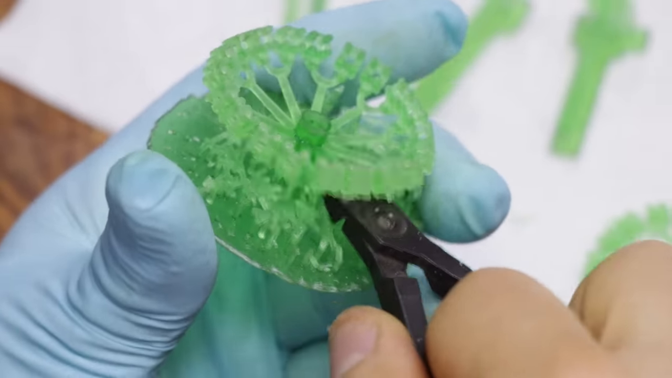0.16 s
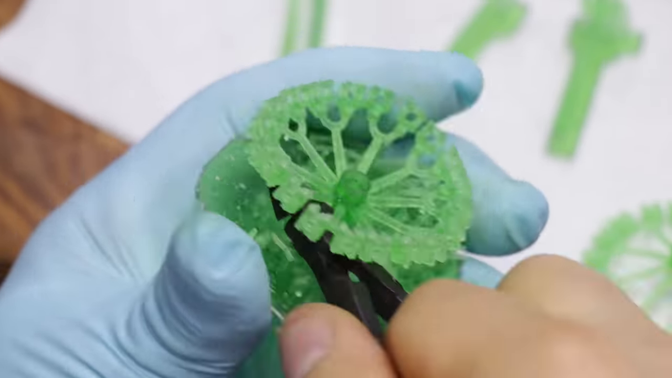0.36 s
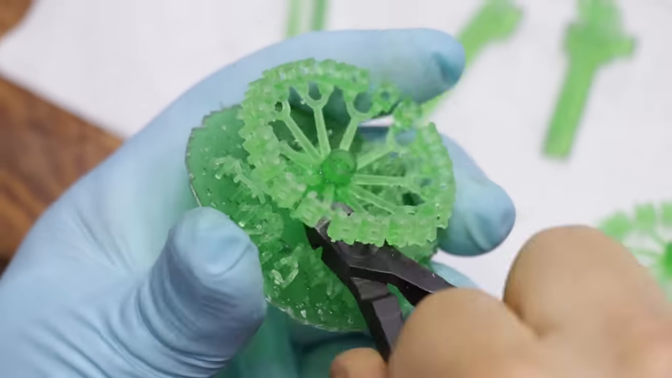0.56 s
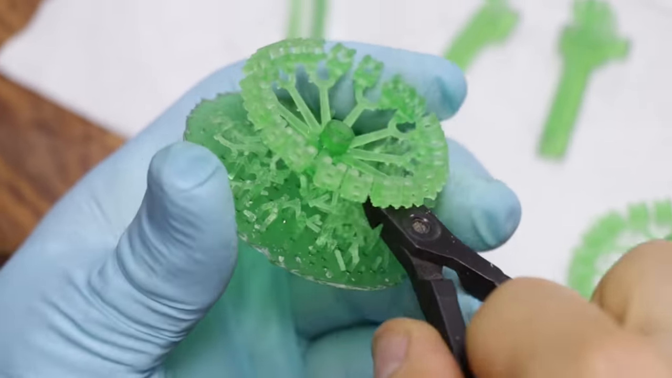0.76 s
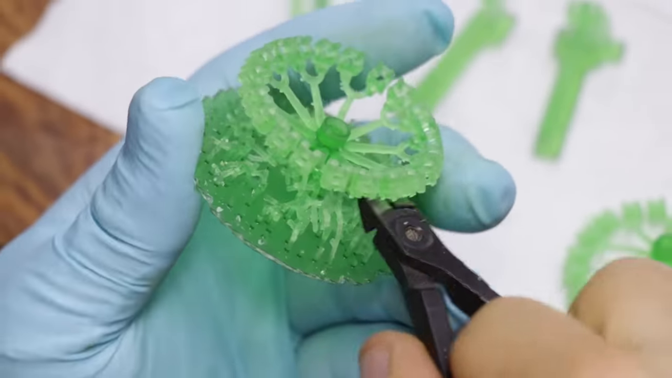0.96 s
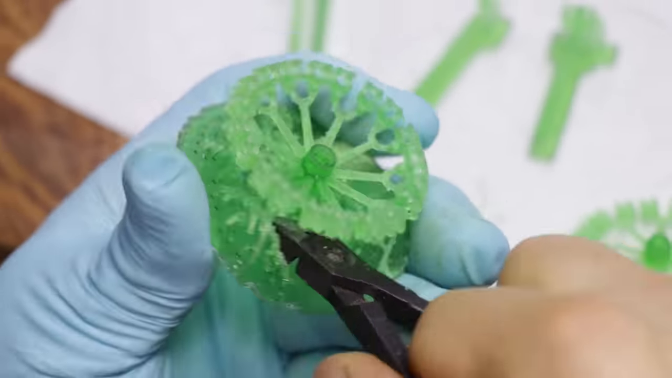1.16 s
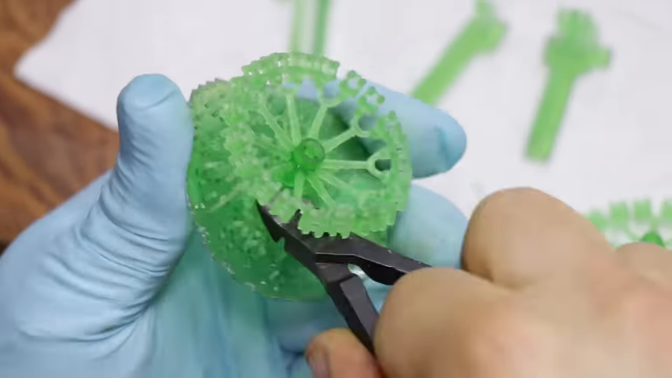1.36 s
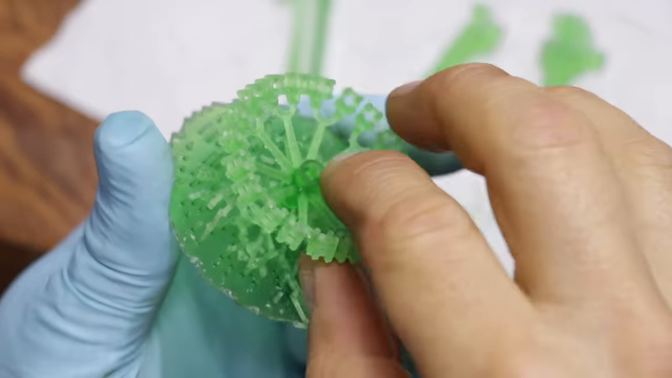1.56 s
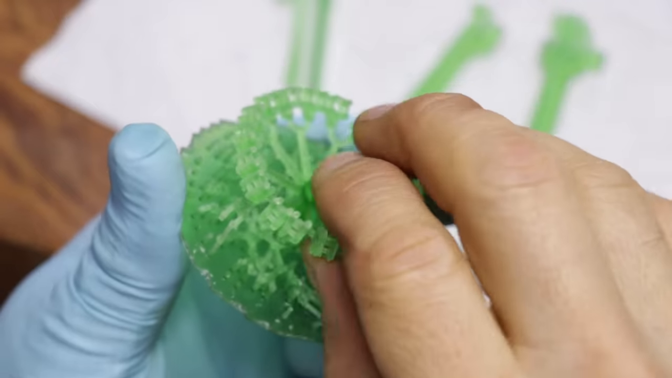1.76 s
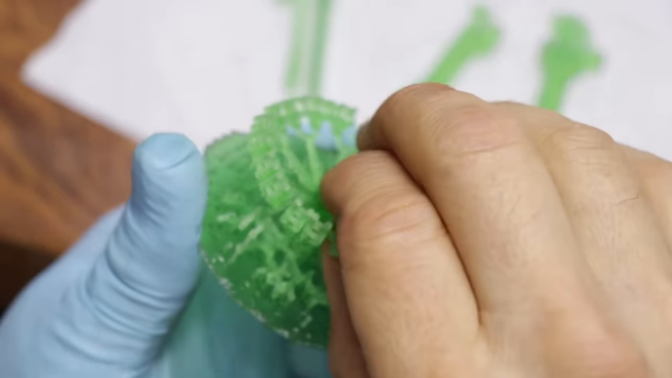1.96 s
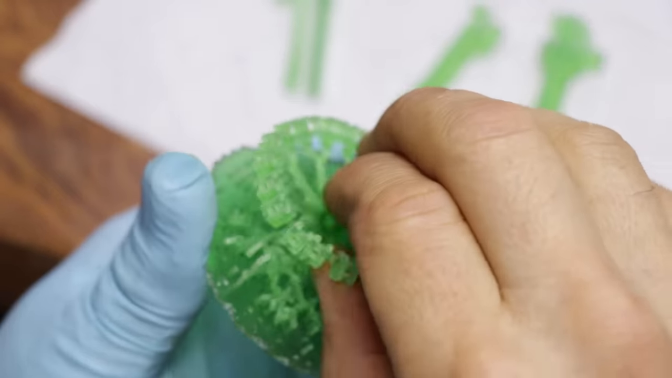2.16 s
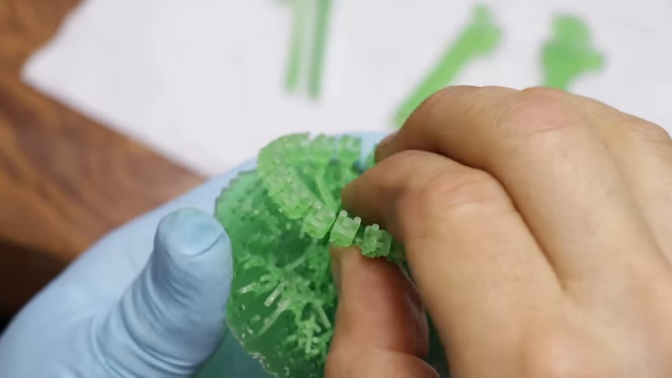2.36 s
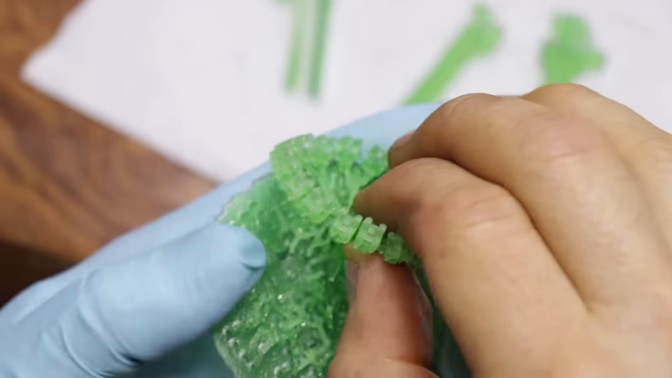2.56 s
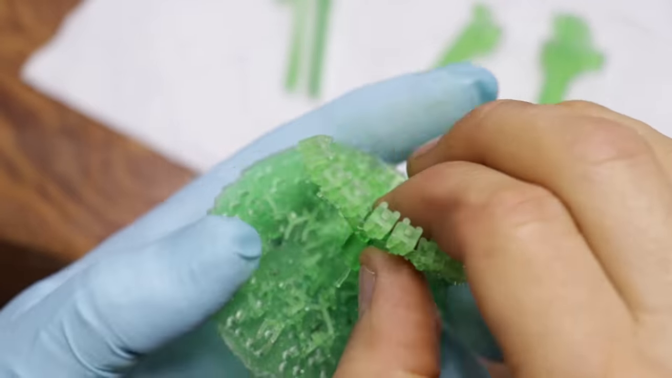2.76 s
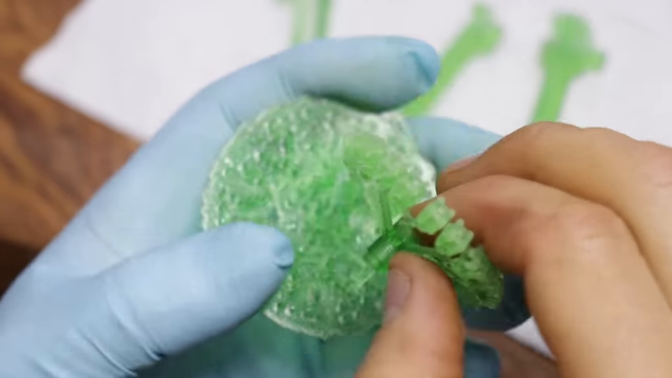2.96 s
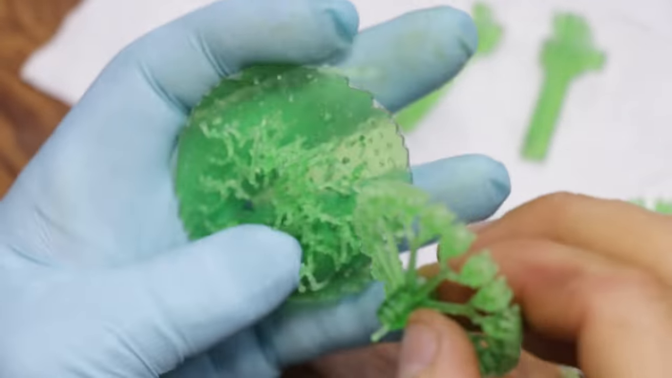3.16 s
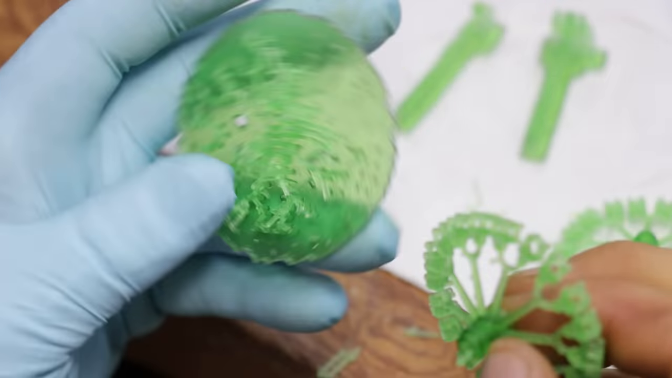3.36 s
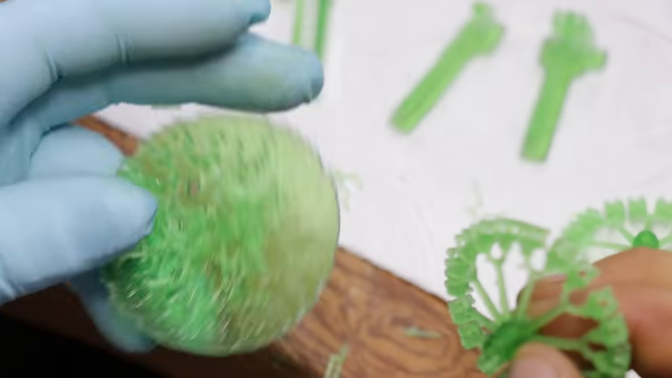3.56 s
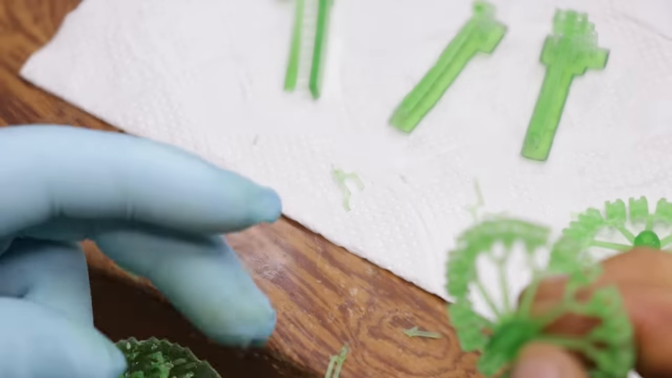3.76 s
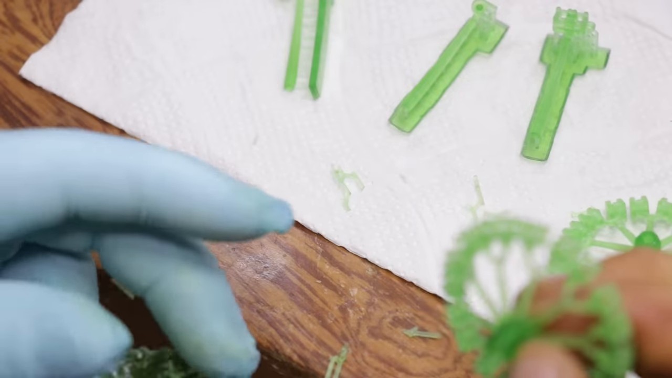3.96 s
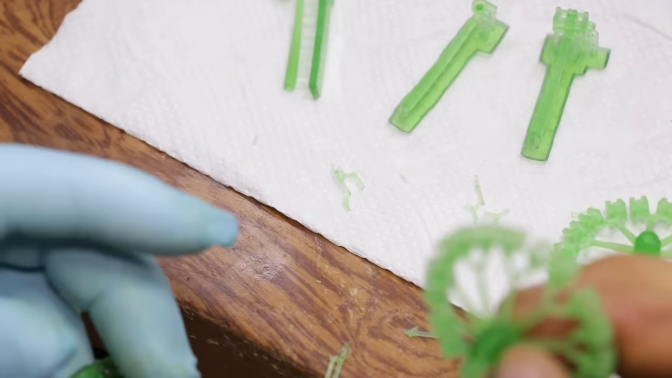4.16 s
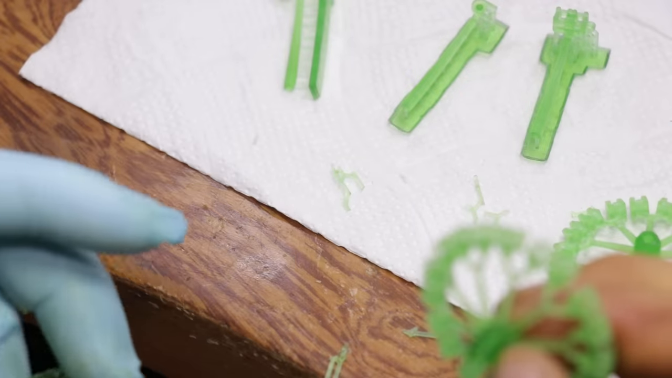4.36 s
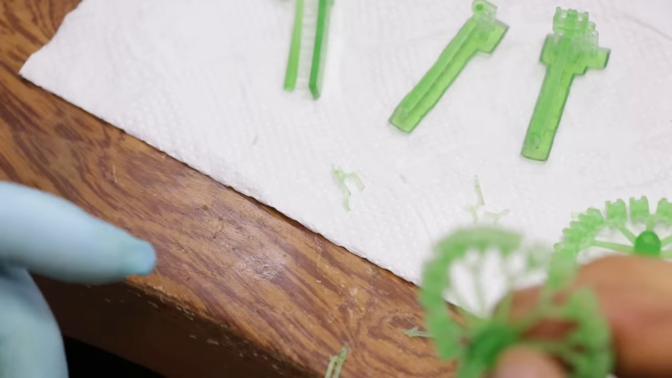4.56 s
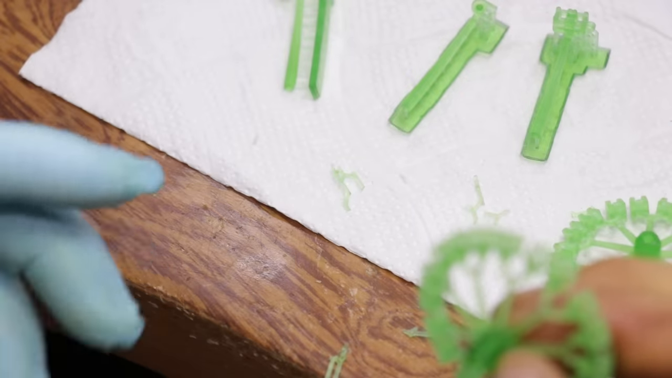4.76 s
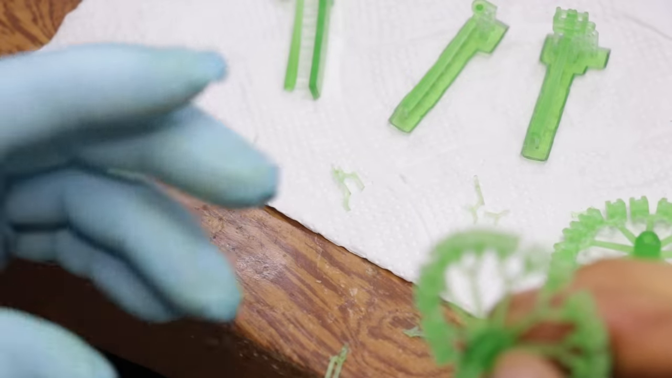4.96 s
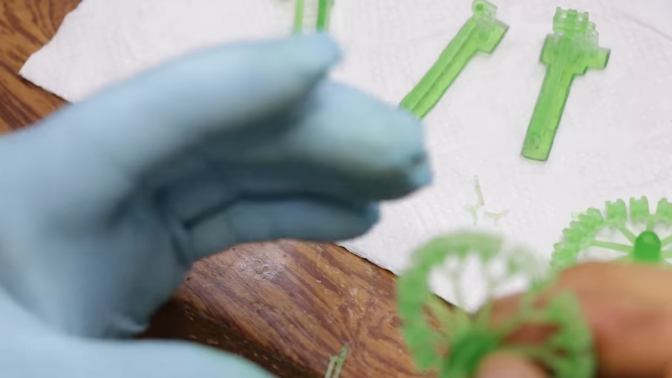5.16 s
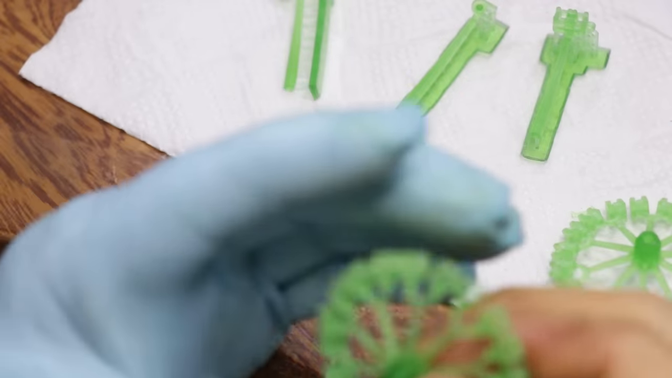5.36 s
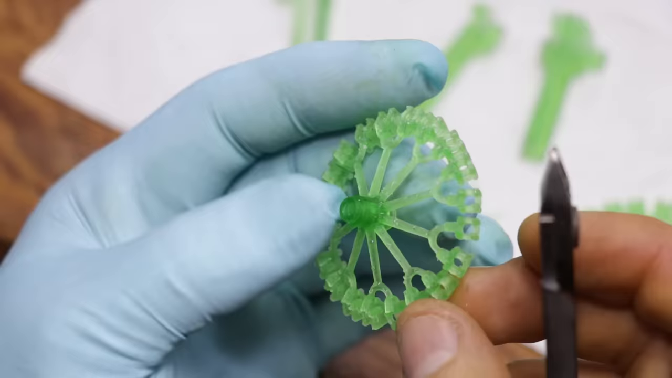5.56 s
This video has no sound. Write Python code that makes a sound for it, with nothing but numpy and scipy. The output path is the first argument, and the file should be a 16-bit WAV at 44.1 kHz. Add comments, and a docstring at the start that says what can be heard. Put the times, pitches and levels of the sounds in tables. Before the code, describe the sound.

In a quiet, faintly humming room, a close stereo microphone picks up cutters snapping through brittle plastic supports, many crisp clicks in rapid clusters. Next come short crackling rips as the piece is pulled from its base by hand. The sound drops out for a moment, a little tick follows, and then the base lands in a hollow bin with a loud ringing knock, a few bounces and a fading rattle.

```python
"""First, flush cutters snip thin resin supports in quick bursts, each snap making the part ring.
Then fingers twist and tear the part off its raft (the base it stands on) with a crackly rasp.
After a short silence come one small click and a faint stir, and the raft is tossed into a hollow bin,
where it bounces and rattles to rest. A quiet room hums underneath, except during the silence.
Two spaced microphone ports hear the work close by."""
import sys
import numpy as np
from scipy import signal
from scipy.fft import rfft, irfft, next_fast_len
from scipy.io import wavfile

SR = 44100
rng = np.random.default_rng(int(sys.argv[2]) if len(sys.argv) > 2 else 0)


def to_wav(s):
    """Save 16-bit WAV."""
    ch = np.atleast_2d(s).T  # columns
    pcm = np.round(np.clip(ch, -1, 1) * 32767)  # PCM
    wavfile.write(sys.argv[1], SR, pcm.astype(np.int16))


N = 247136

# The resin part's low, middle and bright ringing tones: (pitch [Hz], width [Hz], level [dB])
PART_LOW = [(523, 470, 3), (1250, 705, 9), (1926, 590, 10.5), (2595, 870, 7.5)]
PART_MIDDLE = [(2928, 300, 0.0018), (3857, 1200, 0.0075)]
PART_BRIGHT = [(6290, 2130, 3), (8800, 730, 8), (12210, 10000, 3.5), (13520, 9200, -8)]
# Snips and the louder chip ticks. A ring time (t60) is how long a sound takes to fall by 60 dB.
# (time [s], middle level [dB], low level [dB], bright level [dB], bright ring time [ms])
SNAPS = [(0.023, -36, -27, -22, 25.5), (0.057, -55, -58, -46, 20), (0.1436, -49, -40, -34, 17),
         (0.152, -23.5, -24.5, -16.5, 13), (0.263, -44, -45, -43, 17), (0.2961, -28, -16, -21.5, 17),
         (0.305, -38, -41, -39, 13), (0.4051, -23, -27, -18.5, 36), (0.419, -53, -41, -51, 13),
         (0.434, -45, -42, -49, 38), (0.444, -38, -32, -44, 38), (0.4702, -39, -52, -33, 20),
         (0.6019, -30.5, -30, -28, 27), (0.6184, -33, -39, -36, 49), (0.628, -32.5, -22.5, -32, 27),
         (0.7045, -50, -46, -43.5, 41), (0.751, -42.5, -45, -41, 26), (0.7767, -44, -39.5, -36.5, 37),
         (0.7905, -37, -50, -26.5, 37), (0.809, -39, -48, -40, 21), (0.874, -37, -40.5, -35.5, 33),
         (0.892, -35.5, -33, -28.5, 53), (0.9142, -31.5, -31.5, -30, 31), (0.943, -45, -55, -43, 35),
         (0.9761, -45, -69, -38, 18), (1.0185, -31, -30, -27.5, 29), (1.036, -45, -48, -37, 38),
         (1.051, -42.5, -50, -42.5, 42), (1.1219, -49, -47.5, -38.5, 26), (1.1335, -42, -47, -46, 28),
         (1.181, -40, -49, -38, 9.2), (1.1923, -23.5, -29.5, -22, 13), (1.198, -33, -27, -15, 9.8),
         (1.211, -16, -20, -22.5, 23), (1.256, -49, -47, -41, 28), (1.3433, -39.5, -37.5, -44, 24),
         (1.385, -45, -36.5, -45, 27), (1.3975, -25, -25, -23, 14), (1.408, -54, -35, -38, 21),
         (1.4226, -33, -37.5, -34.5, 18), (1.432, -49, -62, -45, 19), (1.5033, -42, -28, -49, 24),
         (1.515, -63, -34, -64, 52), (1.53, -18, -11.5, -20.5, 14), (1.5395, -29, -34, -30, 37),
         (1.6118, -44.5, -50, -44.5, 39), (4.0512, -53, -46, -50.5, 55)]


def snips(rise_s=0.0032, tail_db=-20, tail_t60_s=0.099, chip_count=10, chip_t60_ms=27):
    """The blades crush in for a moment, the support snaps and dies away fast, a faint tail lingers."""
    envelopes = np.zeros((3, 2, N))   # loudness over time, for each tone group and side
    t = np.arange(-SR // 50, SR // 5) / SR
    age = t / np.array([1.38, 1.15, 1])[:, None, None]   # lower tones die away more slowly
    # faint chips tick at random while the cutting lasts
    chips = [(rng.uniform(0.04, 1.5), *rng.normal(-52, 3, size=3), chip_t60_ms)
             for _ in range(chip_count)]
    for s, middle_db, low_db, bright_db, t60_ms in chips + SNAPS:
        crush = np.exp(-.5 * (2 * t / rise_s) ** 2)
        fall = amp(-60e3 * age / t60_ms) + amp(tail_db - 60 * age / tail_t60_s)
        shape = np.where(t < 0, crush, fall)
        pan_db = -3 - rng.standard_normal()   # a little to the right, different for each cut
        sides = amp([[pan_db / 2], [-pan_db / 2]])
        levels = amp([low_db, middle_db, bright_db])[:, None, None]
        start = round(s * SR) - SR // 50
        envelopes[:, :, start:start + len(t)] += levels * sides * shape
    return ring_resin(crackle(rough_db=4.5), (PART_LOW, PART_MIDDLE, PART_BRIGHT), envelopes)


# The bent raft's ringing tones, in four groups: (pitch [Hz], width [Hz], level [dB])
BENT_LOW = [(1380, 1060, 2.5), (2267, 250, 6.5), (2734, 674, 3.5)]
BENT_MIDDLE = [(3154, 400, -1.5), (3650, 755, 0.5)]
BENT_BRIGHT = [(5264, 1060, 5.5), (5694, 3600, 4.5), (9500, 6160, -0.5)]
BENT_TOP = [(11680, 1200, 0.82), (15000, 3100, -0.038)]
# Fingers tearing supports; the last three columns are added to the middle level:
# (peak time [s], hold [ms], ring time [ms], middle level [dB], low [dB], bright [dB], top [dB])
RIPS = [(1.775, 12, 70, -45, -6.5, -3, -13), (1.84, 4, 190, -55.5, -24, -16, -18),
        (1.944, 6, 60, -56, -10, -12, -16), (2.04, 3, 45, -56, -16, -14, -12),
        (2.1, 8, 85, -54, -4, -15, -16), (2.16, 13, 85, -40.5, -9, -16, -29),
        (2.22, 3.1, 39.7, -53.5, 3, 5, -1), (2.274, 22.5, 103, -21, -4.5, 1, -3.5),
        (2.472, 3.7, 120, -52.5, 0, 8, 9), (2.508, 3.5, 129, -61, -6, -4, 8),
        (2.58, 2.5, 129, -57, 10, 4, -19), (2.63, 6, 79, -19.5, -8, -8, -39),
        (2.96, 9.9, 300, -58.5, 1, 1, 0), (3.024, 11.5, 45, -40.5, -3, -2, -12),
        (3.182, 3.4, 94, -44.5, -5, 6, -6), (3.214, 3.1, 137, -43.5, -6, 8.5, -22),
        (3.344, 12, 70, -51, 5.5, 2, -12), (3.372, 9.5, 300, -45, 1.5, 1, -31),
        (3.438, 4.3, 258, -55.5, 3, -21, -23), (3.618, 9.7, 80, -47.5, 3, 9, 4)]


def tears(rise_s=0.016, tail_t60_s=0.58):
    """Many supports give way together: a rasp with little bass swells, holds, drops and lingers."""
    envelopes = np.zeros((4, N))
    t = np.arange(-SR // 10, SR // 2) / SR
    swell = np.clip(1 + t / rise_s, 0, 1) ** 1.2
    tail_db = np.array([[-10], [-21], [-15], [-23]])   # low, middle, bright, top
    for s, hold_ms, t60_ms, middle_db, low_db, bright_db, top_db in RIPS:
        age = np.maximum(t - hold_ms / 1e3, 0)
        fall = amp(-60e3 * age / t60_ms) + amp(tail_db - 60 * age / tail_t60_s)
        levels = amp(middle_db + np.array([[low_db], [0], [bright_db], [top_db]]))
        start = round(s * SR) - SR // 10
        envelopes[:, start:start + len(t)] += levels * swell * fall
    rasp = ring_resin(crackle(rough_db=-0.5), (BENT_LOW, BENT_MIDDLE, BENT_BRIGHT, BENT_TOP), envelopes)
    return rasp * amp([[-1], [1]])   # a little to the right


def crackle(rough_db, lag_s=0.0004064, likeness=0.14):
    """Many tiny, uneven cracks. The two ports share some of them, and the right hears those later."""
    shared, left, right = rng.standard_normal((3, N)) * amp(rough_db * drift(270))
    late = np.interp(np.arange(N) - lag_s * SR, np.arange(N), shared)
    return np.sqrt(likeness) * np.array([shared, late]) + np.sqrt(1 - likeness) * np.array([left, right])


def ring_resin(cracks, groups, envelopes):
    """Cracks make each group of tones ring; filtering twice deepens the dips between the tones."""
    out = 0
    for tones, envelope in zip(groups, envelopes):
        ringing = resonate(resonate(cracks * envelope, tones), tones)
        steady = resonate(resonate(cracks[0, :SR], tones), tones)
        out = out + ringing / np.std(steady)   # so the envelope alone sets the level
    return out


# The raft hitting the bin: (time [s], blow level [dB], tick level [dB])
HITS = [(4.7658, -4.5, -29), (4.7768, -11.5, -16), (4.9249, -13, -17.5), (4.9587, -42, -23.5),
        (4.9707, -21, -20), (4.983, -21, -26), (4.99, -23, -26), (5.049, -36, -24), (5.072, -25, -24.5),
        (5.0964, -47, -25.5), (5.122, -42, -30), (5.138, -42, -31.5), (5.179, -39, -23.5),
        (5.235, -31.5, -24.5), (5.246, -24, -29), (5.56, -57, -36.5)]
# The bin's ringing tones: (pitch [Hz], level [dB], ring time [s])
BIN_TONES = [(171.3, -29, 0.16), (274, -16.5, 0.037), (330, -23.5, 0.21), (411, -27.5, 0.69),
             (508.8, -17, 0.29), (576, -18.5, .3), (656, -34, 0.23), (760, -17, 0.089),
             (849.5, -8.5, 0.081), (905, -10.5, 0.023), (978, -14, .08), (1235, -26.5, 0.5),
             (1419, -25.5, 0.31), (1794, -11.5, 0.039), (1990, -21, 0.11), (2905, -12.5, 0.023),
             (3393, -10, 0.017)]
# The tick of the raft's edge: (pitch [Hz], width [Hz], level [dB])
EDGE_TONES = [(3600, 1530, 1), (5000, 1900, 0), (8200, 4900, -8.5)]
# Loose bits rattling in the bin: (time [s], level [dB])
RATTLE_LEVELS = [(4.767, -11), (4.791, -23.5), (4.849, -24.5), (4.917, -32.5), (4.929, -25.5), (4.977, -30),
                 (5.069, -36), (5.227, -39.5), (5.241, -37.5), (5.295, -40.5), (5.531, -65), (5.6, -57.5)]
# The rattle's lower and higher noise: (pitch [Hz], level [dB])
RATTLE_LOW = [(260, -42.5), (450, -5.5), (503, -5), (553, -1.5), (884, -3), (1310, -8), (1430, -2.5),
              (3000, -29.5), (3900, -51), (6600, -120)]
RATTLE_HIGH = [(1180, -28), (2000, 5.5), (2440, 1.5), (3010, 1), (5390, -13.5), (7250, -8), (13200, -30),
               (16000, -18.5)]
# How alike the bin sounds left and right: (pitch [Hz], likeness [-1 to 1])
BIN_STEREO = [(60, 0.33), (240, 1), (950, 0.31), (3770, -0.34), (15000, -0.093)]


def bin_drop(tick_t60_s=0.016):
    """Each bounce makes the bin ring and gives a bright tick; loose bits rattle on in between."""
    hit_s, blow_db, tick_db = np.transpose(HITS)
    hit_at = (hit_s * SR).astype(int)
    rings, ticks = np.zeros((2, N))
    spread_db = rng.normal(0, 2.0, (len(hit_at), len(BIN_TONES)))
    rattle_db, = in_time(RATTLE_LEVELS, edge_db=-120)
    knocks = amp(rattle_db + 1.4 * drift(42))   # the bits knock unevenly
    shake = amp(-21.5) * knocks * rng.standard_normal(N)   # and keep the bin ringing
    for k, (hz, tone_db, t60_s) in enumerate(BIN_TONES):
        pushes = shake * amp(tone_db) + 1e-18
        pushes[hit_at] = amp(blow_db + tone_db + spread_db[:, k])
        decay, angle = amp(-60 / (t60_s * SR)), 2 * np.pi * hz / SR
        rings += signal.lfilter([0, np.sin(angle)], [1, -2 * decay * np.cos(angle), decay ** 2], pushes)
    ticks[hit_at] = amp(tick_db)
    ticks = signal.lfilter([1], [1, -amp(-60 / (tick_t60_s * SR))], ticks + 1e-18)
    edge = ticks * rms_one(resonate(rng.standard_normal((2, N)), EDGE_TONES))
    age = np.arange(N) / SR - RATTLE_LEVELS[0][0]
    boom = shaped_noise([(100, -26), (170, -2.5), (300, 6), (400, 8), (520, -28.5)], BIN_STEREO)
    boom *= amp(rattle_db - 5.5 + 22 * age)   # the boom fades more slowly than the rattle
    treble = amp(-1.5) * shaped_noise(RATTLE_HIGH, BIN_STEREO)
    rattle = knocks * (treble + shaped_noise(RATTLE_LOW, BIN_STEREO))
    bass_cut = signal.butter(4, 150, "high", fs=SR, output="sos")   # the bin's sound keeps no deep bass below about 150 Hz
    return signal.sosfilt(bass_cut, rings + edge + rattle + boom)


# Soft low bumps of hand and bin: (time [s], level [dB], pitch [Hz], swell [ms])
SOFT_BUMPS = [(1.531, -22.5, 409, 2), (1.513, -35.5, 498, 3.9), (2.224, -33, 69, 5.1),
              (3.561, -46.5, 172, 22), (4.975, -20, 313, 5.8), (5.135, -29, 282, 5.8),
              (5.298, -33.5, 192.6, 52), (5.6, -33.5, 186, 9.1)]


def bumps():
    """Each bump is a low tone that smoothly swells and fades."""
    t = np.arange(N) / SR
    out = 0
    for s, db, hz, swell_ms in SOFT_BUMPS:
        swell = np.exp(-.5 * ((t - s) * 1e3 / swell_ms) ** 2)
        out = out + amp(db) * swell * np.cos(2 * np.pi * hz * (t - s))
    return out


# The stir's two soft bands of noise: (pitch [Hz], width [Hz], level [dB])
STIR_BANDS = [(310, 81, -0.5), (905, 46, -8.5)]


def stir():
    """A faint stir swells, holds unevenly and fades just before the toss."""
    db, = in_time([(4.23, -55.5), (4.36, -48.5), (4.6, -48.5), (4.694, -55.5)], edge_db=-120)
    return amp(db + 1.4 * drift(8)) * rms_one(resonate(rng.standard_normal(N), STIR_BANDS))


# The room's background: (time [s], rumble level [dB], hum level [dB], hiss level [dB])
ROOM_LEVELS = [(0, -52.5, -54.5, -52.5), (1.45, -50, -55, -52.5), (1.64, -51, -57, -56.5),
               (1.72, -50, -52.5, -53), (3.6, -53.5, -52, -51.5), (4.1, -45, -47, -51.5),
               (4.35, -58.5, -49, -54), (4.7, -54, -44, -53.5), (5.6, -52.5, -53.5, -53)]
# The noise of its rumble and hiss: (pitch [Hz], level [dB])
RUMBLE = [(12, -41.5), (20, -18.5), (54, -8.5), (92, -7.5), (129, -7.5), (330, -6.5), (412, -10),
          (461, -12.5), (900, -41.5), (1170, -60), (1980, -120)]
HISS = [(290, -29), (500, 0), (1430, -4.5), (1730, -7), (3660, -10.5), (4830, -15), (6190, -11.5),
        (10000, -12.5), (15100, -20.5), (15800, -29), (16500, -55.5)]
# The tones the room rings at: (pitch [Hz], width [Hz], level [dB])
HUM_TONES = [(46, 11, 1.5), (81.2, 10, -0.5), (159.6, 14, -4), (421, 33, -7.5)]
# How alike left and right are, for rumble and hiss, then for hum: (pitch [Hz], likeness [-1 to 1])
ROOM_STEREO = [(60, 0.49), (250, 0.15), (1000, 0.067), (8000, 0.092)]
HUM_STEREO = [(50, 0.72), (160, 0.98)]


def room():
    """A low rumble, a wavering hum at the room's own tones and a smooth hiss above."""
    rumble_db, hum_db, hiss_db = in_time(ROOM_LEVELS)
    rumble = amp(rumble_db + 0.5 * drift(6.1)) * shaped_noise(RUMBLE, ROOM_STEREO)
    hiss = amp(hiss_db) * shaped_noise(HISS, ROOM_STEREO)
    hum_gain = amp(hum_db + 1.9 * drift(2.4))
    even_noise = shaped_noise([(20, 0), (1000, 0)], HUM_STEREO)
    hum = hum_gain * rms_one(resonate(resonate(even_noise, HUM_TONES), HUM_TONES))
    return rumble + hiss + hum


def amp(db):
    """Turn decibels into a number to multiply by."""
    return 10 ** (np.asarray(db) / 20)


def rms_one(x):
    """Scale a signal so its average strength (rms) is 1."""
    return x / np.sqrt(np.mean(x ** 2) + 1e-20)


def in_time(rows, edge_db=None):
    """Each level column at every sample; outside the table's times it is edge_db, if given."""
    times, *columns = np.transpose(rows)
    return [np.interp(np.arange(N) / SR, times, column, edge_db, edge_db) for column in columns]


def at_hz(points, hz):
    """Read a table between its pitches, with octaves evenly spaced."""
    pitches, values = np.transpose(points)
    return np.interp(np.log(hz), np.log(pitches + 1), values)


def drift(rate_hz):
    """A smooth random wobble, about 1 in size."""
    decay = np.exp(-40 * np.pi * rate_hz / SR)
    noise = rng.standard_normal(N // 20 + 2002)   # one value every 20 samples
    slow = signal.lfilter([1], [1, -2 * decay, decay ** 2], noise)[2000:]
    return np.interp(np.arange(N) / 20, np.arange(len(slow)), rms_one(slow))


def resonate(x, tones):
    """Let a signal ring at each tone and add the results, flipping every second one."""
    out = 0
    for k, (hz, width, db) in enumerate(tones):
        decay = np.exp(-np.pi * width / SR)
        feed = np.array([1, 0, -1]) * (1 - decay ** 2) / 2
        feedback = [1, -2 * decay * np.cos(2 * np.pi * hz / SR), decay ** 2]
        out = out + (-1) ** k * amp(db) * signal.lfilter(feed, feedback, x + 1e-18)
    return out


def shaped_noise(levels, likeness):
    """Stereo noise of strength 1, with its own level and left-right likeness at each pitch."""
    size = next_fast_len(N)
    hz = np.arange(size // 2 + 1) * SR / size + 1
    mid, side = rfft(rng.standard_normal((2, size))) * amp(at_hz(levels, hz))
    alike = np.clip(at_hz(likeness, hz), -1, 1)
    spectrum = np.sqrt(1 + alike) * mid + np.sqrt(1 - alike) * side * [[1], [-1]]
    return rms_one(irfft(spectrum, size)[:, :N])


def scene():
    """The cutting, the tearing and the toss into the bin, over the quiet room."""
    return snips() + tears() + bin_drop() + bumps() + stir() + room()


def record(dry, mute_from_s=3.661, mute_to_s=4.047, cutoff_hz=16640):
    """Mute a short stretch almost fully, round off loud peaks and cut the highest treble."""
    t = np.arange(N) / SR
    fade_out = (mute_from_s - t) / 0.035
    fade_in = (t - mute_to_s) / 0.004
    gate = np.clip(np.maximum(fade_out, fade_in), 0, 1)
    gated = dry * (gate ** 1.5 + amp(-52))
    rounded = 1.133 * np.tanh(gated / 1.47)
    return signal.sosfilt(signal.cheby2(14, 70, cutoff_hz, fs=SR, output="sos"), rounded)


dry = scene()
out = record(dry)
to_wav(out)
```